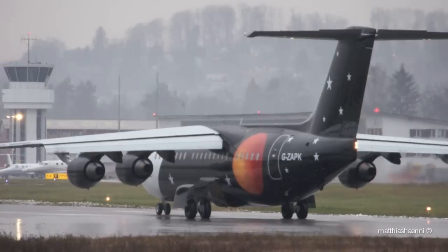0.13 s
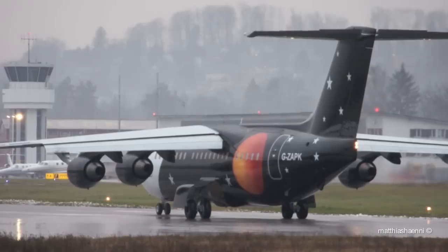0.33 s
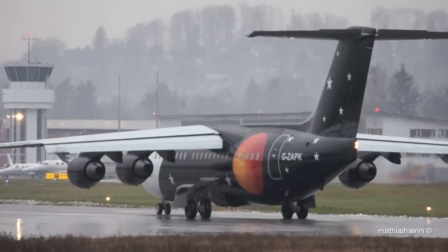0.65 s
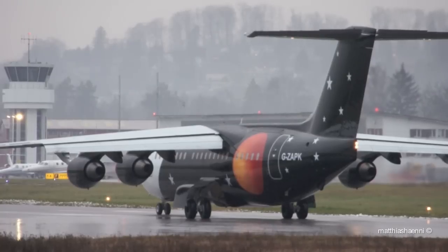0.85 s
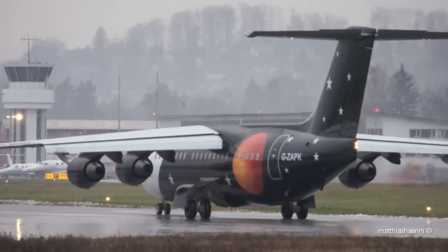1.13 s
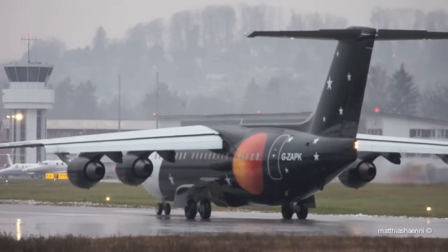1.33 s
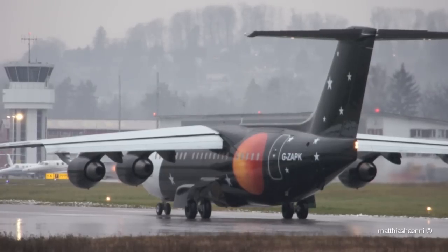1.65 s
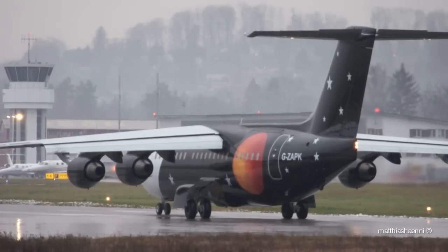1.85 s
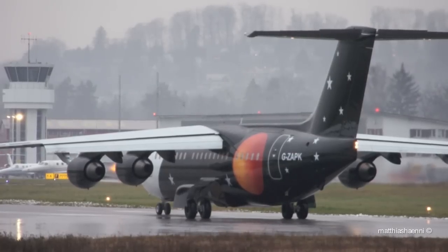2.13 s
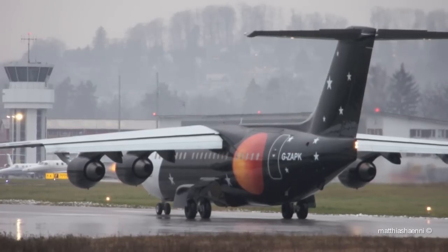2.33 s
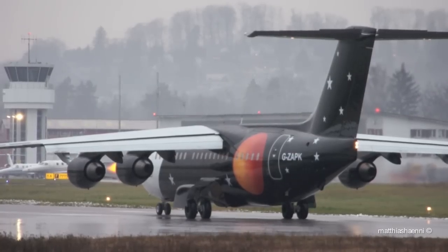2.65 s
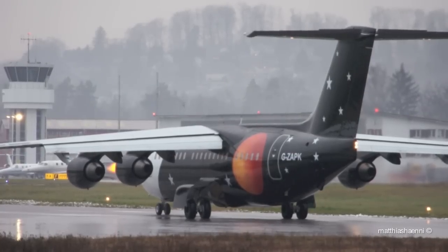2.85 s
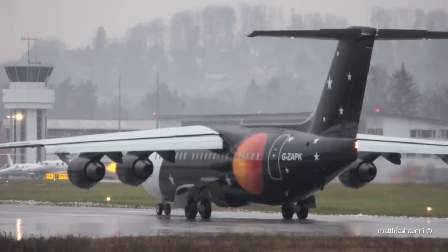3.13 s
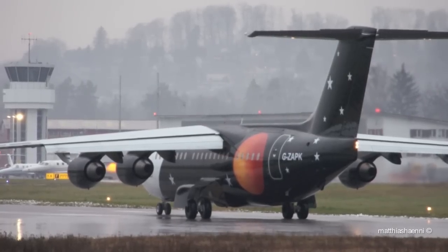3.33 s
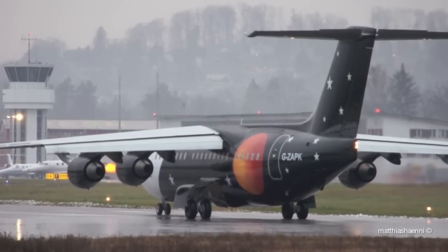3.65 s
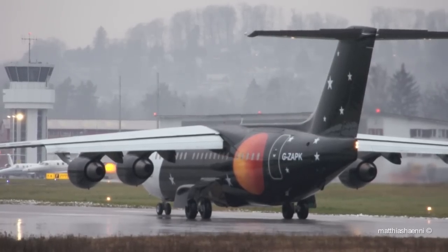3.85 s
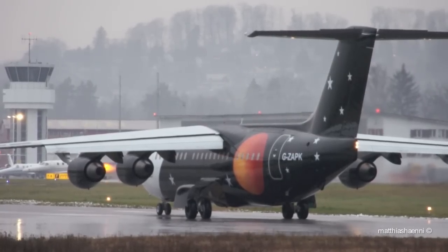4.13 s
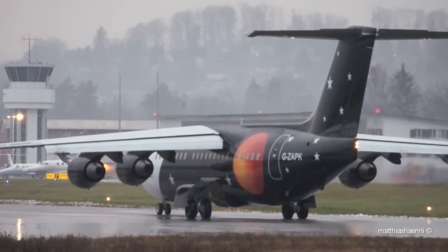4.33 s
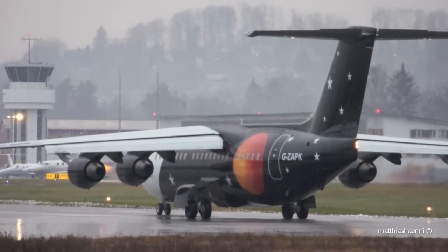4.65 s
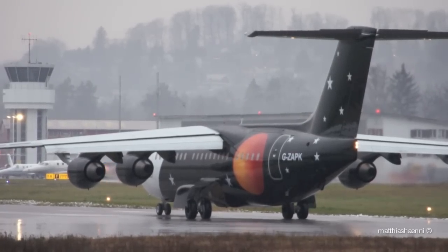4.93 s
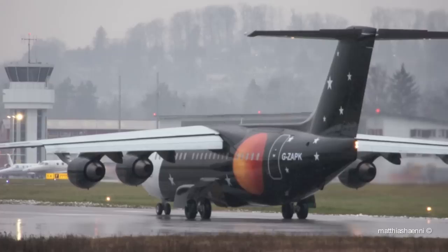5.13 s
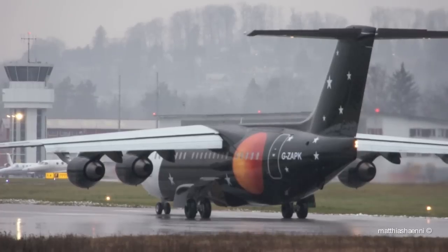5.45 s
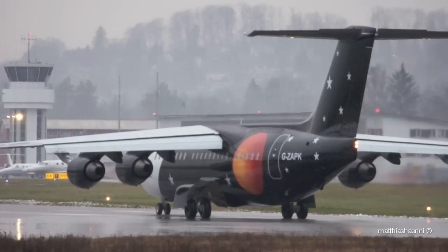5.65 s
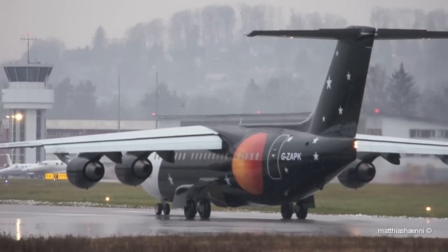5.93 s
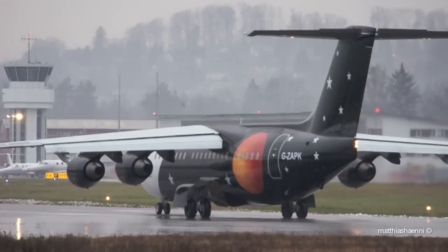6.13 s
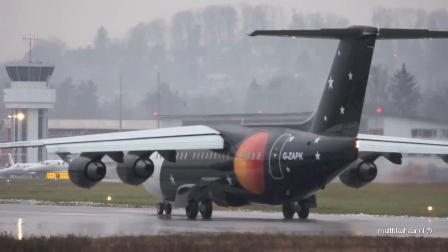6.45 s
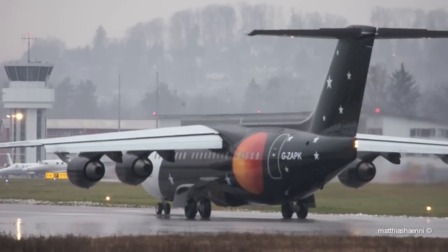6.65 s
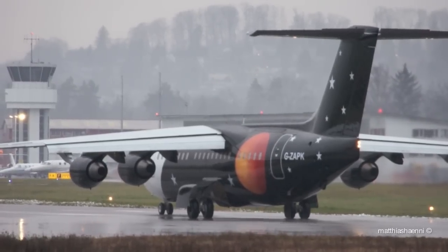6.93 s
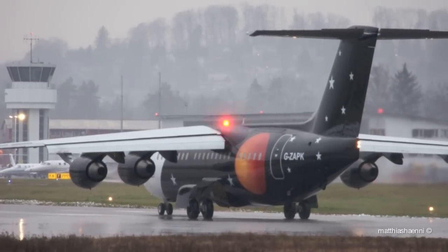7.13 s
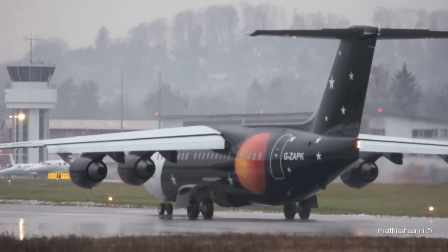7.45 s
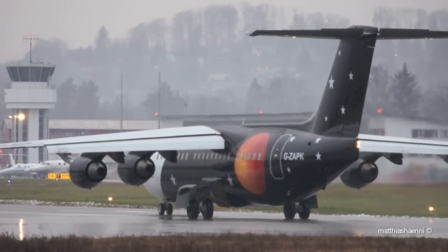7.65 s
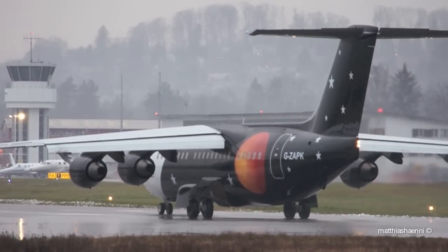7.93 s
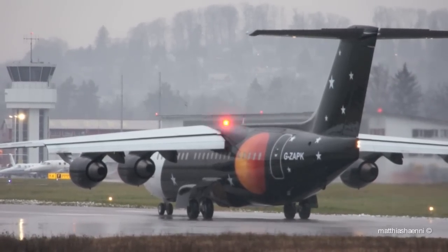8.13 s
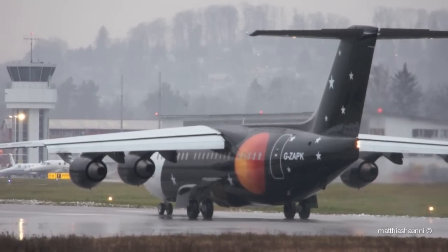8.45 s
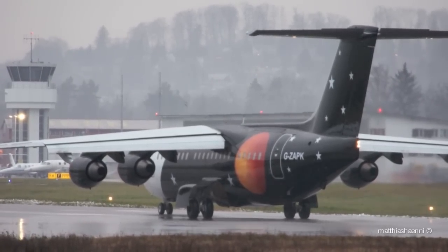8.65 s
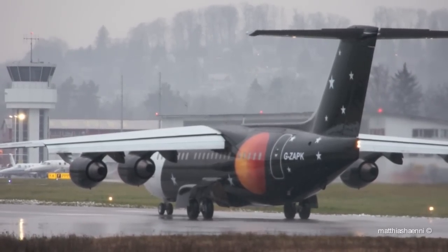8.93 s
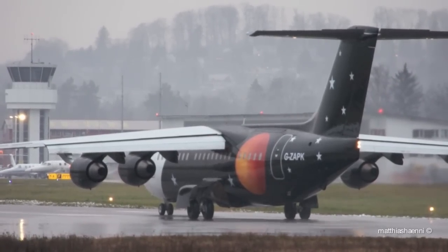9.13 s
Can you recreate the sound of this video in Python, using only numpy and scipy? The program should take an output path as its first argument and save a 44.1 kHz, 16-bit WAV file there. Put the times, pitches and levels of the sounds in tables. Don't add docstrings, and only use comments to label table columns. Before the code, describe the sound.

Outdoors at an airfield, distant turbofans spool up from idle. Thin whistles rise and vanish early, while the main fan tone and its shimmering octave sweep upward, slightly detuned between engines. Jet noise grows from soft throbbing rumble to a wide roar with hiss. Late on, heavy bass bursts make the microphone's limiter duck the sound.

```python
import sys
import numpy as np
from scipy import signal
from scipy.fft import rfft, irfft
from scipy.io import wavfile
from scipy.ndimage import uniform_filter1d

SR = 44100
rng = np.random.default_rng(int(sys.argv[2]) if len(sys.argv) > 2 else 0)


def store_pcm(level_fs):
    pcm = np.round(np.clip(level_fs, -1, 1) * 32767).astype(np.int16)
    wavfile.write(sys.argv[1], SR, np.atleast_2d(pcm).T)


def attenuation_scalar(level_db):
    decades = np.asarray(level_db, float) / 20
    return 10 ** decades


N = 410130

# (time [s], blade passing rate [Hz], blade tone level [dB])
FAN = [(.2, 1571, -44), (.55, 1585, -33.5), (.92, 1624, -34.5), (1.05, 1647, -43), (1.35, 1707, -38),
       (1.95, 1850, -39), (2.5, 1997, -33), (2.8, 2115, -33), (3.55, 2492, -29), (4.05, 2691, -33),
       (4.65, 2913, -29), (5.7, 3327, -29.5), (6.15, 3498, -33), (6.45, 3606, -29), (7.35, 3909, -35),
       (8.3, 4166, -39), (8.9, 4380, -45), (9.3, 4445, -41)]
# (blade rate [Hz], level [dB])
OCTAVE = [(1570, -52), (1620, -46), (1850, -42), (2480, -40), (2780, -50), (3280, -45), (3800, -52),
          (4450, -70)]
# (frequency [Hz], left-right likeness [0-1], left minus right [dB], left lead [rad])
PORTS = [(30, .97, -9.5, -.65), (65, .995, -8, -.8), (110, .995, -6.5, -.87), (190, .98, -3.5, -.7),
         (340, .96, -1.5, -.55), (620, .91, .5, -.25), (1100, .93, 1.5, -.08), (1900, .8, 2, -.25),
         (3000, .89, .5, .2), (5000, .92, 0, .3), (7000, .94, .5, .25), (9000, .99, 0, 0),
         (12500, .6, 0, 0)]


def curves(rows, t):
    s, *columns = np.transpose(rows)
    return [np.interp(t, s, c) for c in columns]


def spectra(rows, hz):
    f, *columns = np.transpose(rows)
    return [np.interp(np.log(hz + 0.00092), np.log(f), c) for c in columns]


def wander(shape, sizes):
    x = rng.standard_normal(shape)
    for axis, size in enumerate(sizes):
        x = uniform_filter1d(x, size, axis)
        x = uniform_filter1d(x, size, axis)
    return x / np.sqrt(np.mean(x ** 2) + 1e-20)


def tone(hz, db, width_hz, clean, same):
    a, b, c, d = rng.standard_normal((N, 4)).T
    same, clean = np.clip(same, 0, 1), np.clip(clean, 0, 1)
    left, other = a + 1j * b, c + 1j * d
    chance = np.array([left, same * left + np.sqrt(1 - same ** 2) * other])
    pole = np.exp(-np.pi * width_hz / SR)
    fading = signal.lfilter([1], np.convolve([1, -pole], [1, -pole]), chance)
    fading = fading / np.sqrt(np.mean(abs(fading) ** 2))
    carrier = np.exp(2j * np.pi * np.cumsum(hz) / SR)
    envelope = np.sqrt(clean) + np.sqrt(1 - clean) * fading
    return attenuation_scalar(db) * np.sqrt(2) * (envelope * carrier).real


def drones():
    # (time [s], upper tone [Hz], upper level [dB])
    drone_rows = [(0, 67.5, -27), (1.5, 66.8, -25), (2, 65.9, -28), (3, 65.5, -22), (4, 65.2, -25),
                  (5.5, 62.5, -22.5), (7, 61, -32), (9.3, 60, -23)]
    # (time [s], beat rate [Hz])
    beat_rows = [(0, 3.64), (.8, 3.68), (1.0, 4.0), (2.2, 4.1), (2.6, 5.2), (4, 6), (5, 5.4), (9.3, 5)]
    lower_db = -12
    t = np.arange(N) / SR
    hz, upper_db = curves(drone_rows, t)
    turns = np.cumsum(hz) / SR
    slip_turns = .33 + np.cumsum(curves(beat_rows, t)[0]) / SR
    upper = attenuation_scalar(upper_db) * np.cos(2 * np.pi * turns)
    lower = attenuation_scalar(upper_db + lower_db) * np.cos(2 * np.pi * (turns - slip_turns))
    return np.sqrt(2) * (upper + lower)


def whistles():
    # (time [s], pitch [Hz], level [dB])
    whistle_rows = [
        [(0, 5087, -50), (.4, 5095, -49), (.7, 5125, -49), (.95, 5255, -55), (1.3, 5450, -54), (1.8, 5650, -60),
         (2.7, 6080, -60), (3.2, 6400, -75)],
        [(0, 5243, -49), (.5, 5248, -50), (.85, 5290, -56), (1.2, 5400, -75)],
    ]
    t = np.arange(N) / SR
    return sum(tone(*curves(rows, t), width_hz=20, clean=.4, same=.8) for rows in whistle_rows)


def thumps():
    # (time [s], peak level [dB])
    thump_rows = [(5.65, 3.5), (6.022, 10.5), (6.06, 1), (6.18, 2.5), (6.322, 6), (6.572, 9.5), (6.82, 5),
                  (6.901, 3), (6.96, 3), (7.129, 3), (7.29, 9), (7.588, 10), (7.80, 2.5), (7.858, 1.5),
                  (8.059, 6.5), (8.209, 0), (8.27, 6.5), (8.439, -2), (8.48, 9), (8.762, 6.5), (8.869, 5),
                  (9.102, 0.1), (9.241, 4.5)]
    out, t = np.zeros(N), np.arange(N) / SR
    for s, db in thump_rows:
        near = slice(round((s - .05) * SR), round((s + .05) * SR))
        since_s = t[near] - s
        out[near] += attenuation_scalar(db) * np.exp(-(since_s / 0.0081) ** 2) * np.sin(2 * np.pi * 83 * since_s)
    return out


def layer(colour_db, level_db, hz, band_hz):
    power = attenuation_scalar(2 * colour_db)
    inside = (hz > band_hz[0]) & (hz < band_hz[1])
    return power / power[:, inside].sum(1, keepdims=True) * attenuation_scalar(2 * level_db)[:, None]


def exhaust(size=2048):
    # (time [s], jet power [0-1], exhaust haze on the path [0-1])
    exhaust_rows = [(0, 0.05, 0.16), (.6, 0.17, 0.12), (1.2, 0.19, 0), (1.8, 0.26, 0), (2.4, 0.37, 0.08),
                    (3, 0.53, 0.02), (3.6, 0.72, 0), (4.2, 0.77, 0), (4.8, 0.84, 0.02), (5.4, 0.95, 0.08),
                    (6, 1.02, 0), (6.6, 1, 0.29), (7.2, 1, 0.6), (7.8, 0.95, 0.79), (8.5, .93, 0.78),
                    (9.3, 0.92, 1.01)]
    # (frequency [Hz], idle level [dB], high-thrust level [dB])
    rumble_rows = [(15, -55, -42), (25, -16, -3), (44.3, -18, -8.5), (74, 1, 3), (102, -1, -1.5),
                   (160.2, -8, -1.5), (248.4, -26.5, -19.5), (327, -36, -24.5), (600, -72, -90)]
    drumming_rows = [(150, -11, 1), (247, 3.5, 6), (360, 1.5, 3.5), (450, 3, 1.5), (615, -17, -3.5),
                     (920, -36, -51)]
    roar_rows = [(300, -15, -22), (530, -6, -31), (637, -5, 1), (870, -0.5, 1.5), (1300, 2.5, 1.5),
                 (1500, 0, 0), (1620, -3.5, -4.5), (2100, -2, -4.5), (3050, -16.5, -7), (5060, -7, -14),
                 (8300, -44, -47)]
    hiss_rows = [(2400, -1, 2), (3140, -2.5, 2.5), (3870, 2.5, 5), (4370, -7.5, 6.5), (4850, -1.5, 2.5),
                 (5390, -12.5, -4.5), (6020, -6, -3.5), (8420, -20, -12), (10460, -27.5, -20.5),
                 (12400, -36, -29), (13000, -62, -69), (22000, -99, -99)]
    # (frequency over blade rate [ratio], level [dB])
    wake_rows = [(.6, -5.5), (.85, 6), (1, 20.5), (1.15, 5), (1.4, -6.5), (1.9, -3), (2.25, -0.5),
                 (2.6, -38), (3.2, -56), (4.5, -99)]
    # (idle [dB], rise at full power [dB], bend [exponent], loss in full haze [dB])
    following_rows = [
        (-29, 17.5, 1.08, 3),
        (-45, 17.5, 3.8, 1),
        (-36.5, 11, 1.15, 6.5),
        (-43.5, 9.5, 0.9, 10),
        (-55.5, 28.5, 0.28, 16),
    ]
    frames, hz = 4 * N // size + 6, np.fft.rfftfreq(size, 1 / SR)
    t = np.arange(frames) * size / 4 / SR
    blades_hz = curves(FAN, t)[0]
    thrust = ((blades_hz - blades_hz.min()) / np.ptp(blades_hz))[:, None]
    jet, haze = np.clip(curves(exhaust_rows, t), 0, 2)
    rumble_db, drum_db, roar_db, hiss_db, wake_db = (
        idle_db + rise_db * jet ** bend - loss_db * haze
        for idle_db, rise_db, bend, loss_db in following_rows)

    def blend(rows):
        idle_db, full_db = spectra(rows, hz)
        return (1 - thrust) * idle_db + thrust * full_db

    power = layer(blend(rumble_rows), rumble_db, hz, band_hz=(85, 250))
    power += layer(blend(drumming_rows), drum_db, hz, band_hz=(270, 560))
    power += layer(blend(roar_rows), roar_db, hz, band_hz=(700, 1450))
    power += layer(blend(hiss_rows), hiss_db - 1.5, hz, band_hz=(5400, 11000))
    wake_colour_db = spectra(wake_rows, hz / blades_hz[:, None])[0]
    power += layer(wake_colour_db, wake_db, hz, band_hz=(0, 20000))
    gusts_db = 0.51 * wander((frames, len(hz)), sizes=(5, 30))
    gusts_db = gusts_db + 0.35 * wander((frames, 1), sizes=(4,))
    power *= attenuation_scalar(2 * gusts_db * np.clip(hz / 1500, 0, 1))

    a, b, c, d = rng.standard_normal((frames, len(hz), 4)).T
    same = np.clip(spectra(PORTS, hz)[0], 0, 1)[:, None]
    shared, apart = np.sqrt(1 + same) * (a + 1j * b), np.sqrt(1 - same) * (c + 1j * d)
    z = np.array([shared + apart, shared - apart]) * np.sqrt(power.T / (1 + same))
    return signal.istft(z, nperseg=size, noverlap=3 * size // 4)[1][:, :N] * np.sqrt(2 / 3)


def leading_engines(hz):
    # (time [s], speed over the others [ratio], blade tone level [dB])
    leader_rows = [(0, 1.1, -53), (2.2, 1.11, -46), (3, 1.15, -44), (4.5, 1.12, -39), (5.5, 1.095, -31.5),
                   (6.2, 1.09, -32), (7, 1.08, -39), (8.3, 1.05, -41), (9.3, 1.01, -40)]
    surge_db, surge_s, surge_half_s = 9, 2.95, .5
    t = np.arange(N) / SR
    ahead, db = curves(leader_rows, t)
    octave_db = spectra(OCTAVE, ahead * hz)[0] - 7
    octave_db += surge_db * np.exp(-((t - surge_s) / surge_half_s) ** 2)
    out = tone(ahead * hz, db, width_hz=260, clean=0, same=.9)
    return out + tone(2 * ahead * hz, octave_db, width_hz=140, clean=0, same=.9)


def stage_lines(hz):
    # (multiple of blade rate [ratio], width [Hz], top level [dB], top time [s])
    stage_rows = [(3.7, 150, -51, 1.4), (4.02, 160, -63, 1.8), (4.55, 140, -63, 1.2)]
    fade_db_per_s2 = 4.2
    t, out = np.arange(N) / SR, np.zeros((2, N))
    for multiple, width_hz, top_db, top_s in stage_rows:
        db = top_db - fade_db_per_s2 * (t - top_s) ** 2
        out += tone(multiple * hz, db, width_hz, clean=0, same=0.99)
    return out


def fans():
    t = np.arange(N) / SR
    hz, db = curves(FAN, t)
    hz = hz * (1 + .003 * wander(N, sizes=(2500,)))
    twinkle_db = 1.2 * wander((N, 2), sizes=(1500,)).T
    clean = .8 - .095 * t
    mismatch = .008 + .0015 * t
    octave_db = spectra(OCTAVE, hz)[0] + 1.5 + twinkle_db[1]
    out = tone(hz, db - .3 + twinkle_db[0], width_hz=42, clean=clean, same=.75)
    out += tone((1 + mismatch) * hz, db - 7 + .15 * t, width_hz=260, clean=0, same=.75)
    out += tone(2 * hz, octave_db, width_hz=170, clean=.08, same=.8)
    return out + leading_engines(hz) + stage_lines(hz)


def scene():
    # (time [s], mean limiter reduction [dB])
    overload_rows = [(4, 0), (7, 2.5)]
    pushed = attenuation_scalar(curves(overload_rows, np.arange(N) / SR)[0])
    return pushed * (drones() + whistles() + exhaust() + fans()) + attenuation_scalar(-9.0) * thumps()


def top_cut(x):
    return signal.sosfilt(signal.butter(12, 15690, fs=SR, output="sos"), x)


def record(dry):
    preamp_db, recovery_db_per_s = -67, 60.
    hz = np.fft.rfftfreq(N, 1 / SR)
    _, balance_db, lead_rad = spectra(PORTS, hz)
    air = 1 / (1 + (hz / 11800) ** 12)
    left = attenuation_scalar(balance_db) * np.exp(1j * lead_rad)
    ports = np.array([left, np.ones_like(left)]) * 2 * air / abs(1 + left)
    x = irfft(rfft(dry) * ports, N)
    loud_db = 10 * np.log10(uniform_filter1d((x ** 2).mean(0), size=44100))
    hiss_db = preamp_db - 1.4 * np.maximum(loud_db + 17, 0)
    x = x + attenuation_scalar(hiss_db) * rng.standard_normal((N, 2)).T

    fall_db = np.arange(N) * recovery_db_per_s / SR
    peak_db = 20 * np.log10(abs(x).max(0) + 1e-9)
    held_db = np.maximum.accumulate(peak_db + fall_db) - fall_db
    over_db = np.maximum(held_db + 3.5, 0)
    smooth_db = signal.oaconvolve(over_db, np.hanning(201) / 100)[150:N + 150]
    return top_cut(x * attenuation_scalar(-.75 * smooth_db))


dry = scene()
out = record(dry)
store_pcm(out)
```